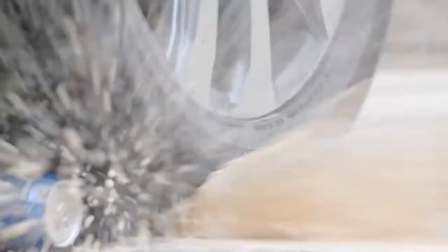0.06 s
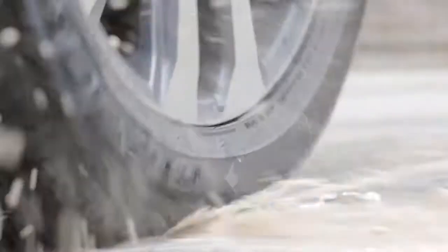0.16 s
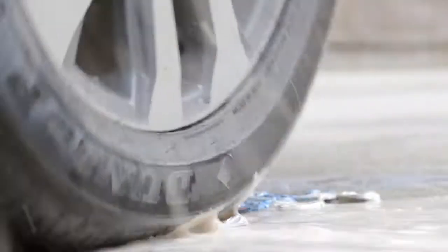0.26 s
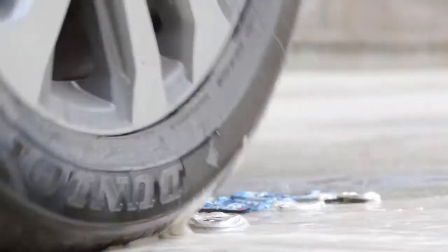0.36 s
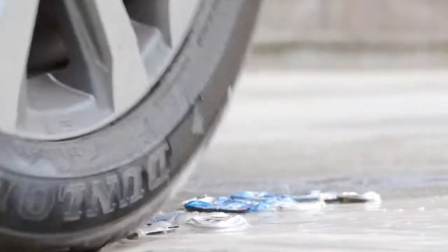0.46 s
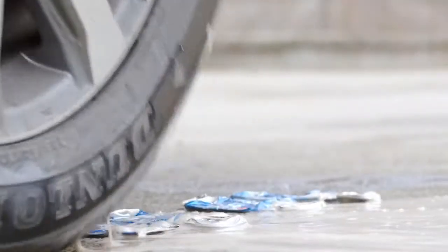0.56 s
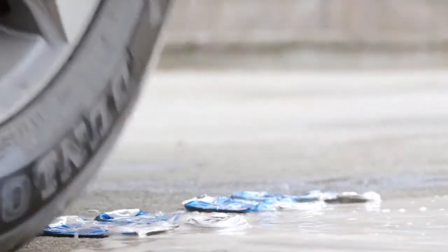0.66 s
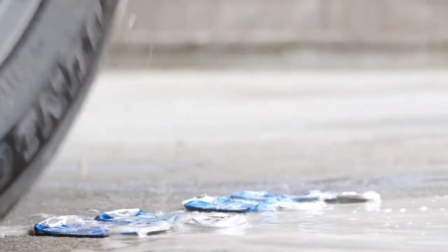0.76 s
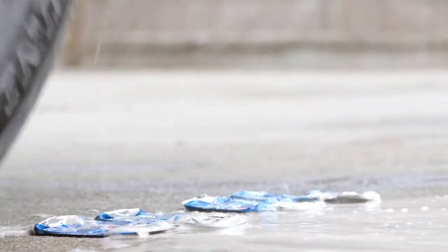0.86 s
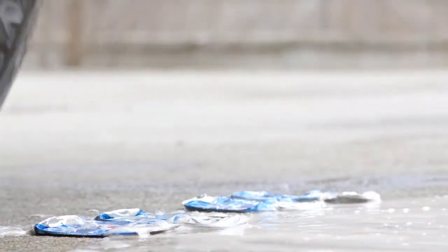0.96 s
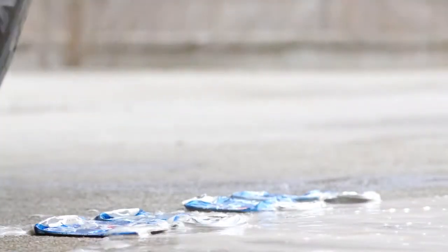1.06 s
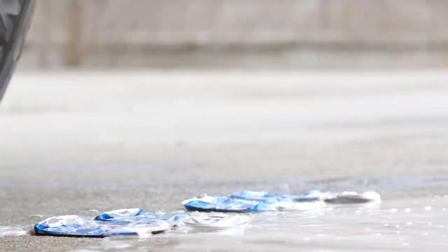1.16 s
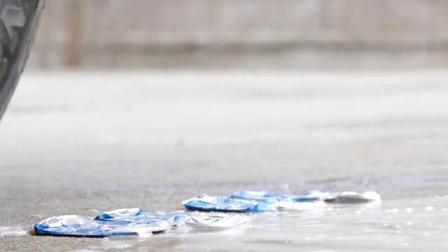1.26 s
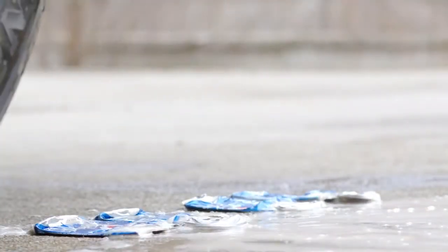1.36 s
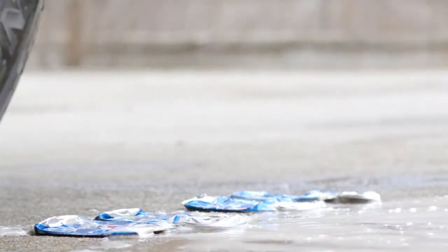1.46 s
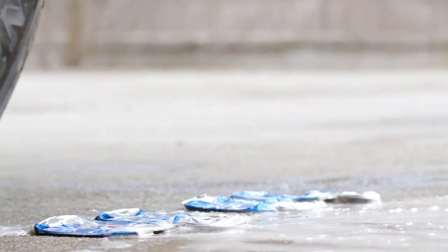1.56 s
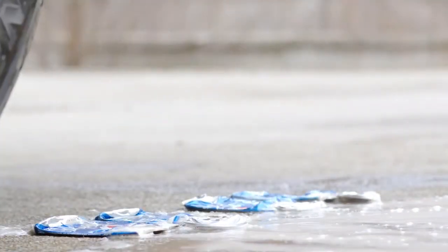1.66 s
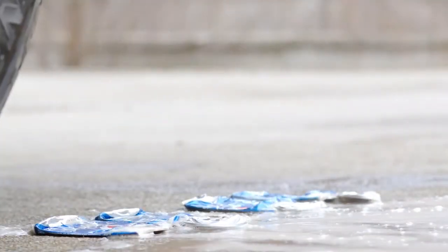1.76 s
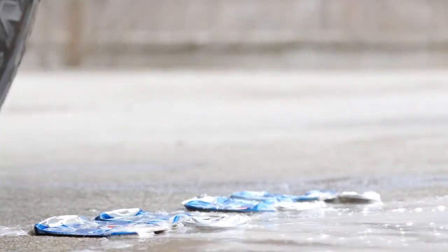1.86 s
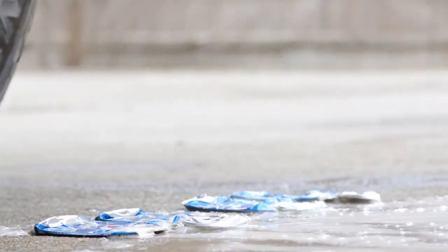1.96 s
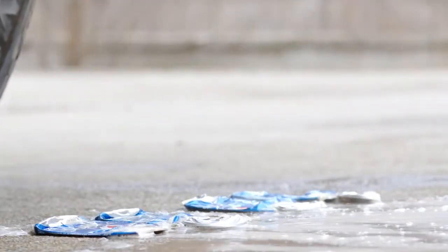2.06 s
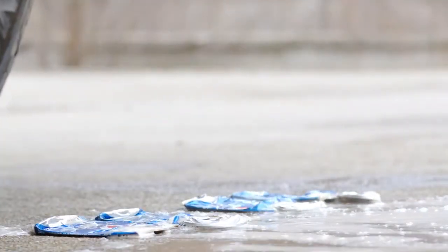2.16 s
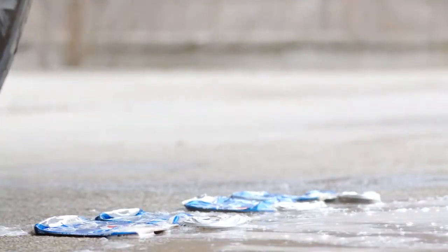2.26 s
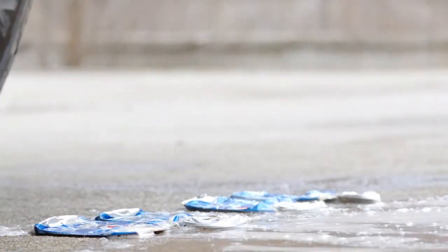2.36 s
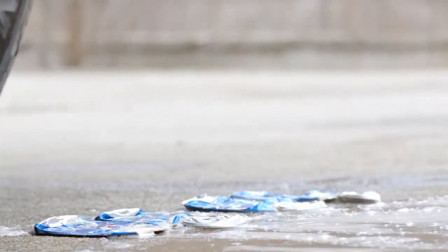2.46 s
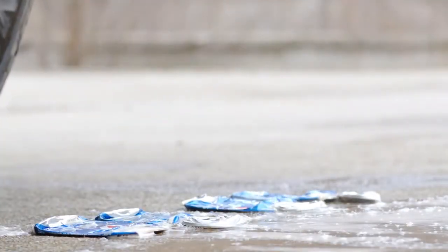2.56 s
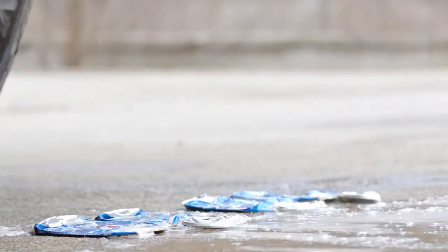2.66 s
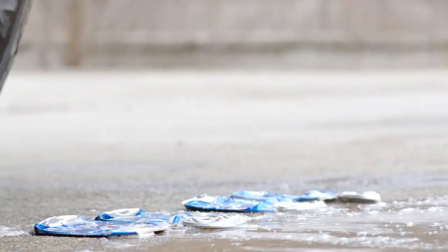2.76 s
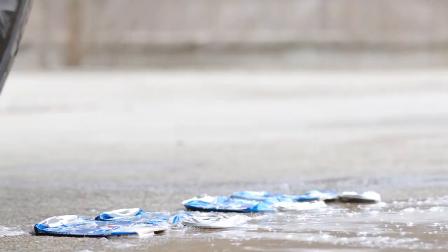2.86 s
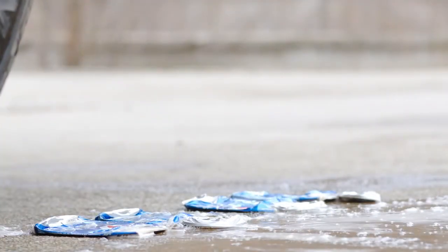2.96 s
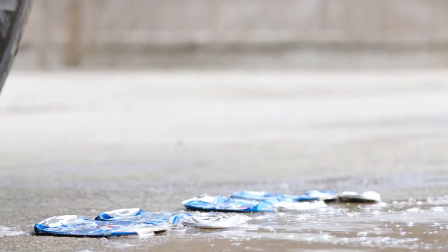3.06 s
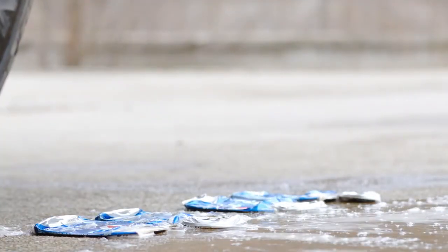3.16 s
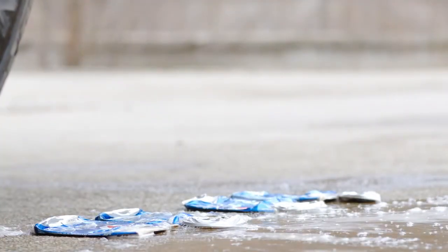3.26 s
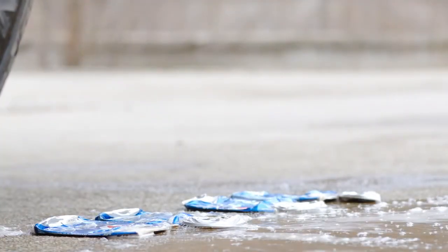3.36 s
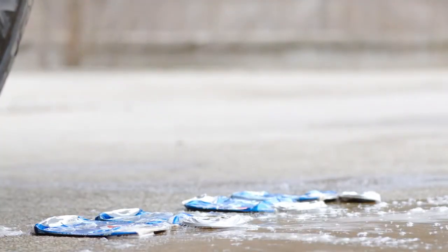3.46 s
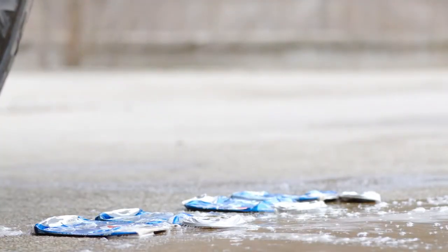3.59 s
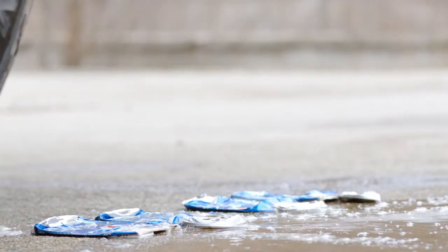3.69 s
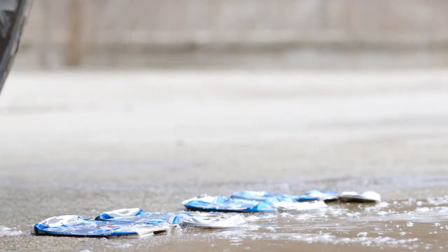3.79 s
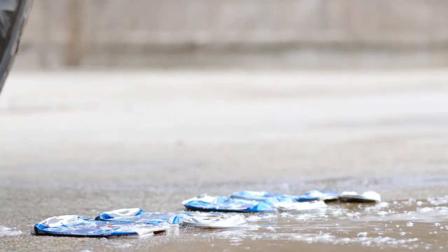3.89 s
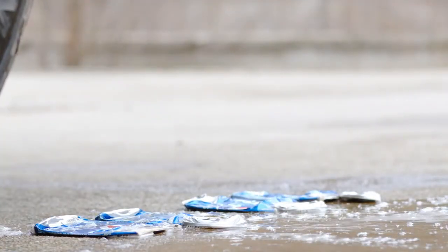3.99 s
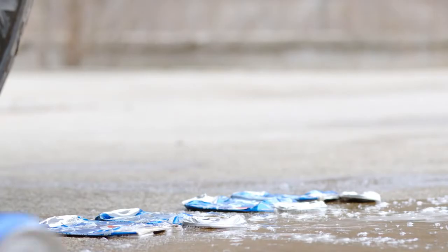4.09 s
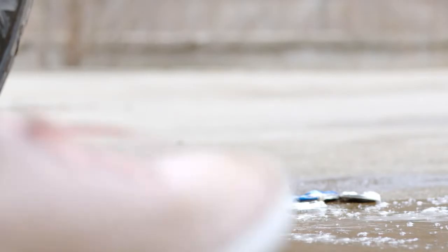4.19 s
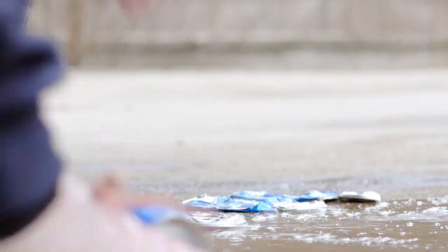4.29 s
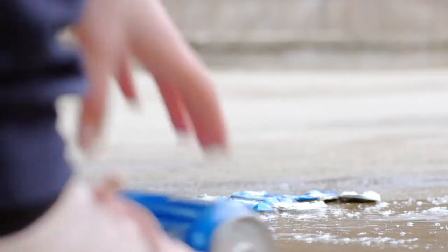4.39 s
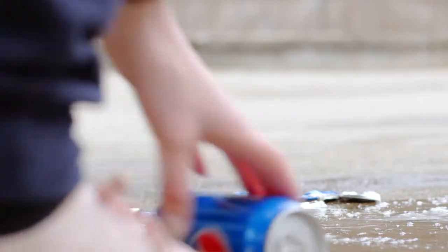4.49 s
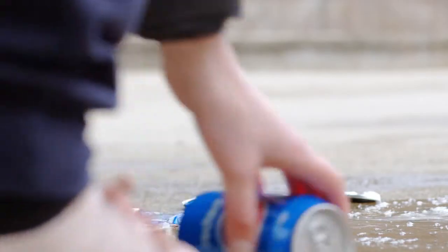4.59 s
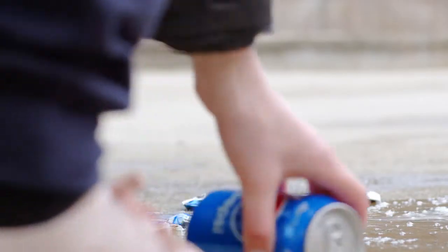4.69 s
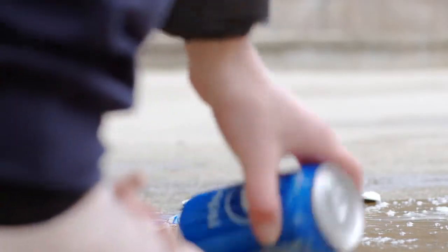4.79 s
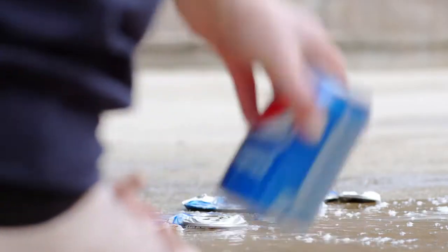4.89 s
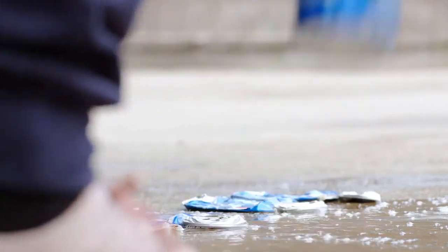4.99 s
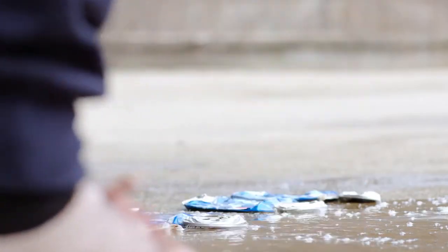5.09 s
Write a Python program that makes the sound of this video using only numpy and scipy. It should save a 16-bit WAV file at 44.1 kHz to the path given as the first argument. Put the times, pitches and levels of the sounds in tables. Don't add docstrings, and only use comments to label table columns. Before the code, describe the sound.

Outdoors on wet concrete, close to a camera microphone: right at the start a full can bursts under a rolling tyre with a hard pop, low thump, crackling metal and spattering jet. The burst is over within half a second. A much quieter engine idles steadily with low hum and clatter, foam fizzes faintly, wind rumbles on the microphone, and near the end the engine is switched off and runs down.

```python
import sys
import numpy as np
from scipy import signal
from scipy.fft import rfft, irfft
from scipy.io import wavfile
from scipy.ndimage import uniform_filter1d

SR = 44100
rng = np.random.default_rng(int(sys.argv[2]) if len(sys.argv) > 2 else 0)


def generate_wav(signal):
    frames = np.transpose(np.atleast_2d(signal))
    scaled = np.clip(frames, -1, 1) * 32767
    pcm = np.round(scaled).astype(np.int16)
    wavfile.write(sys.argv[1], SR, pcm)


def gain_from_decibels(decibels):
    exponent = np.asarray(decibels, float) / 20
    return 10 ** exponent


N = 226585
T = np.arange(N) / SR


def noise():
    return rng.standard_normal(N)


def unit(x):
    return x / np.sqrt(np.mean(x ** 2))


def peak_one(x):
    return x / np.max(np.abs(x))


def band(x, lo_hz, hi_hz, order=2):
    edges = [lo_hz, min(hi_hz, .45 * SR)]
    return signal.sosfilt(signal.butter(order, edges, "band", fs=SR, output="sos"), x)


def colour(x, points, rings=()):
    hz = np.maximum(np.arange(N // 2 + 1) * SR / N, 1)
    f, db = np.transpose(points)
    gain = gain_from_decibels(np.interp(np.log(hz), np.log(f), db, left=-80))
    for centre, width, _ in rings:
        gain = gain * (1 + 1 / (1 + (2 * (hz - centre) / width) ** 2))
    return unit(irfft(rfft(x) * gain, N))


def walk(rate):
    k = int(SR / rate)
    levels = np.repeat(rng.standard_normal(N // k + 1), k)
    return 0.3 * uniform_filter1d(uniform_filter1d(levels, k), k)[:N]


def grains(rate, spread_db):
    clicks = rng.random(N) < rate / SR
    return clicks * noise() * gain_from_decibels(spread_db * rng.exponential(size=N))


def ring(hz, t60, length):
    t = T[:int(SR * length)]
    return -np.sin(2 * np.pi * hz * t) * np.exp(-np.log(1000) * t / t60)


def swell(s, rise, fall):
    return np.exp(-np.maximum((s - T) / rise, (T - s) / fall))


def step(s, length):
    return np.clip((T - s) / length + .5, 0, 1)


def add(track, s, sound):
    i = int(s * SR)
    track[i:i + len(sound)] += sound[:N - i]


def blast():
    shock_s, shock_length_s = .0368, .0013
    shock = .29 * np.cos(np.pi / 2 * np.clip((T - shock_s) / shock_length_s, -1, 1)) ** 2

    slosh_s, slosh_hz, slows_s, dies_s = .044, 23, .12, .17
    after = T - slosh_s
    turns = slosh_hz * slows_s * (1 - np.exp(-after / slows_s))
    swing = -.19 * 1.2 * np.tanh(1.1 * np.cos(2 * np.pi * turns))
    slosh = swing * np.exp(-np.abs(after / dies_s) ** 3) * step(shock_s + .003, .006)

    thud = unit(band(noise(), 64, 116)) * gain_from_decibels(-27) * swell(slosh_s, 0.009, 0.044)
    buffet = unit(band(noise(), 138, 398)) * gain_from_decibels(-7.5 - 31.5) * np.exp(-(after / .12) ** 2)
    return shock + slosh + thud + buffet


# (time [s], peak level [dB], pitch [Hz], treble level over the crack [dB])
BUCKLES = [(.038, -27.5, 500, 7.5), (.04, -15.5, 710, 5), (0.0442, -14, 890, -17), (0.0614, -11, 880, -20),
           (.0647, -12.5, 800, -17), (0.0696, -16.5, 874, -0.5), (.091, -21.5, 1030, -13),
           (0.1223, -16, 1280, -28), (0.1332, -15, 1570, -13.5), (0.1355, -12.5, 1594, -43),
           (.1703, -23.5, 1370, -20), (0.2162, -25.5, 1550, 0.5), (0.225, -28, 1420, -14),
           (0.273, -29, 915, -26), (0.2801, -29, 725, -5.5), (0.2989, -31, 1700, -24),
           (0.3028, -30.5, 1830, -28), (.3393, -39.5, 960, 12.5), (0.3418, -26.5, 880, -26),
           (.439, -26, 1470, -14), (0.4582, -28.5, 780, -30), (.478, -28.5, 1470, -19),
           (0.4803, -33, 855, 0.5), (.483, -29.5, 1460, -20), (.5255, -37.5, 680, -7),
           (.6614, -36.5, 790, 0), (0.8084, -28, 930, -18), (0.8243, -43, 690, -17),
           (0.8344, -38, 800, -15), (1.2074, -37, 640, -16)]


def crumple():
    out = np.zeros(N)
    t = T[:500]
    t60 = 0.017
    for s, db, hz, treble_db in BUCKLES:
        lower_hz = hz * (0.67 + 0.021 * rng.standard_normal())
        upper_hz = hz * (1.42 + 0.32 * rng.standard_normal())
        body = ring(hz, t60, t60) + 0.1 * ring(lower_hz, t60, t60)
        body += 0.55 * ring(upper_hz, t60 / 2, t60)
        tear = rng.standard_normal(500) * np.exp(-t / .0013) - 8 * (t == 0)
        crack = peak_one(band(tear, 0.62 * hz, 1.56 * hz))
        snap = peak_one(band(tear, 1900, 4600, order=3) + .17 * band(tear, 4600, 11000))
        add(out, s, gain_from_decibels(db - 7) * body)
        add(out, s, gain_from_decibels(db - 3) * crack + gain_from_decibels(db + treble_db - 1) * snap)
    return out


# (time [s], peak level [dB], frequency [Hz], decay time T60 [s], rise time [s])
LONE_MODES = [
    (.05, -36.5, 179, 1.1, .02),
    (.134, -21, 580, .04, .002),
    (3.855, -52, 1080, .35, .03),
]


def lone_rings():
    out = np.zeros(N)
    for s, db, hz, t60, rise in LONE_MODES:
        build_up = np.minimum(T[:int(SR * t60)] / rise, 1)
        add(out, s, gain_from_decibels(db) * ring(hz, t60, t60) * build_up)
    return out


def yard_echo(can):
    t60 = 0.2
    tail = band(rng.standard_normal(SR // 3), 140, 7400, order=1)
    tail = tail * np.exp(-np.log(1000) * T[:SR // 3] / t60)
    return gain_from_decibels(-15) * signal.fftconvolve(can, tail / np.sqrt(np.sum(tail ** 2)))[:N]


# (frequency [Hz], spectral level [dB per Hz])
JET_SPECTRUM = [(100, -26), (280, -8), (450, 1.5), (800, -0.5), (1400, -7), (2000, -5), (3000, -10),
                (4200, -20.5), (15500, -38)]
# (frequency [Hz], spectral level [dB per Hz])
FIZZ_SPECTRUM = [(2060, 0.5), (3500, 1.5), (3850, -1), (4470, 1), (7620, -4), (13300, -9.5), (15100, -8),
                 (15700, -14)]
# (time [s], peak level [dB])
JET_SPURTS = [
    (.002, -30),
    (0.04, -14.5),
    (0.068, -28.5),
    (0.094, -29),
    (0.131, -29),
    (0.169, -35.5),
]
# (time [s], level over the steady mist [dB])
MIST_SURGES = [
    (.042, -1),
    (.072, -3),
    (.095, -2),
    (.172, 3),
]


def spray():
    jet_from_s, empty_s = .038, .222
    flowing = step(jet_from_s, 0.0037) * (1 - step(empty_s, .04))

    spatter = noise() * gain_from_decibels(5.0 * walk(97)) + 1.1 * unit(grains(1500, 1.5))
    spurts = sum(gain_from_decibels(db) * swell(s, 0.0019, 0.0077) for s, db in JET_SPURTS)
    dribble = gain_from_decibels(-53.5) * (1 - step(0.49, 0.15))
    jet = colour(spatter, JET_SPECTRUM) * (spurts + gain_from_decibels(-46.5) * flowing + dribble)

    foam = noise() * gain_from_decibels(0.82 * walk(24.25)) + 0.45 * unit(grains(2500, 1.7))
    surges = 1 + sum(gain_from_decibels(db) * swell(s, .006, 0.023) for s, db in MIST_SURGES)
    mist_db = -59.5 + 3 * (T - jet_from_s) + 3.1 * walk(52)
    mist = gain_from_decibels(mist_db) * flowing * surges
    mist += gain_from_decibels(-46) * np.exp(-T / 0.022)
    bed = gain_from_decibels(-69.5 - 5.5 * np.maximum(T - 1.76, 0))
    return jet + colour(foam, FIZZ_SPECTRUM) * gain_from_decibels(4) * np.hypot(mist, bed)


# (time [s], level of the noise before its band is cut out [dB], low
# edge [Hz], high edge [Hz], decay time [s])
IMPACTS = [(.144, -14.5, 1280, 1750, 0.012), (.601, -27.5, 1690, 2030, 0.011),
           (.811, -31, 800, 1630, 0.019), (1.209, -44.5, 700, 2500, 0.026), (2.81, -59, 7000, 10000, .005),
           (2.1, -65, 3000, 15000, .011), (3.347, -71, 5000, 12000, .005), (3.488, -68, 7000, 15900, .0075),
           (3.935, -53, 5150, 5560, .019), (3.989, -62, 12400, 15500, 0.0065),
           (3.99, -63, 1852, 8241, 0.0087), (4.033, -77, 9000, 15000, .006),
           (4.454, -63, 3600, 15500, 0.01), (4.457, -49, 2400, 3530, 0.041), (2.8, -61, 1210, 4000, .012),
           (4.619, -68, 8640, 15000, .007)]


def ticks():
    out = np.zeros(N)
    for s, db, lo_hz, hi_hz, decay in IMPACTS:
        burst = rng.standard_normal(2000) * np.exp(-T[:2000] / decay)
        add(out, s, gain_from_decibels(db) * band(burst, lo_hz, hi_hz))
    return out


# (time [s], firing rate [Hz])
FIRING_RATE = [
    (0, 46.63),
    (4.2, 46.63),
    (4.41, 44.2),
    (4.61, 40.2),
    (4.85, 35.5),
    (5.14, 31.5),
]


def exhaust_lines(cycle, coast):
    out = np.zeros(N)
    for k, db in zip(LINE_ORDERS, LINE_LEVELS):
        lag = .8 + 2.1 * (2 < k < 16 and k != 8)
        coast_db = 12 if k == 8 else -14 if k < 8 else -12
        level = np.sqrt(2) * gain_from_decibels(db + coast * coast_db + 3.7 * walk(6.57))
        out += level * np.cos(2 * np.pi * k * cycle - lag + 0.14 * walk(1.6))
    return out


LINE_ORDERS = [2, 3, 4, 5, 6, 8, 13, 14, 16, 21, 23, 24, 46]
LINE_LEVELS = [-55, -71, -73, -73, -58, -56, -67, -68, -59, -72, -70, -65, -77]
# (frequency [Hz], spectral level [dB per Hz])
BAY_SPECTRUM = [(88, -24), (150, -2.5), (220, -15), (300, -3), (400, -4), (540, -9), (680, -8), (850, -6.5),
                (950, -12.5), (1900, -13.5), (2100, -22.5), (3200, -22), (3800, -27), (15000, -53.5)]
# (frequency [Hz], width [Hz], level [dB], not used)
BAY_MODES = [(458, 49, -1), (625, 88, 0), (1060, 23, -7), (1884, 20, -7), (2400, 146, -14),
             (2925, 130, -12), (5070, 60, -19)]
# (centre [Hz], width [Hz], level [dB], share of the loose tappet [1])
VALVE_NOISE = [(680, 163, 4, 0.21), (1716, 290, -5.5, 0.59), (3000, 480, -9.5, 0.84),
               (4930, 580, -16.5, 0.88), (6530, 1100, -21.5, 0.55)]


def engine():
    firing_hz = np.interp(T, *np.transpose(FIRING_RATE))
    cycle = .22 + np.cumsum(firing_hz) / (8 * SR)
    firing = 8 * cycle
    coast = 1 - firing_hz / firing_hz[0]
    off = step(4.58, 0.27)
    chance = rng.standard_normal((N // 500, 3))

    since = firing % 1
    strength = gain_from_decibels(2.2 * chance[firing.astype(int), 0])
    puff = .7 + .5 * strength * since / .25 * np.exp(1 - since / .25)
    clatter = colour(puff * noise(), BAY_SPECTRUM, BAY_MODES)
    low = band(clatter, 130, 1190)
    knock = 1 + .3 * np.cos(2 * np.pi * (cycle - .33))
    bright_db = 2 - 20 * (1 - step(0.51, 0.071))
    treble = (clatter - low) * gain_from_decibels(bright_db + .5 * walk(22.0))
    clatter = low * knock * gain_from_decibels(0.2 * walk(31)) + treble

    valves = .5 + .45 * gain_from_decibels(2.5 * chance[firing.astype(int), 1]) * np.exp(-((firing - .25) % 1) / .3)
    turn = cycle - .40
    tappet = np.exp(-(turn % 1) / .15) * gain_from_decibels(1.5 * chance[(turn + 1).astype(int), 2])
    train = np.zeros(N)
    for hz, width, db, share in VALVE_NOISE:
        hiss = unit(band(noise(), hz - width / 2, hz + width / 2, order=3))
        train += gain_from_decibels(db) * hiss * (valves + 2.8 * share * tappet)

    bay = 1.046 * clatter + gain_from_decibels(-1 + 1.5 * off - 6) * train
    return exhaust_lines(cycle, coast) + gain_from_decibels(-58.5 - 5 * off) * bay


# (time [s], wind level [dB], buffeting level [dB])
WIND_GUSTS = [
    (.3, -41.5, -66),
    (.47, -42.5, -58),
    (0.589, -42, -59),
    (0.769, -47, -65),
    (.92, -44, -67),
    (1.152, -41.5, -49.5),
    (1.42, -42.5, -58),
    (1.68, -53.5, -49),
    (4.26, -52.5, -86),
    (4.92, -54, -69),
]


def wind():
    gust_s = 0.08
    speed, shake = gain_from_decibels(-64), gain_from_decibels(-62)
    for s, wind_db, buffet_db in WIND_GUSTS:
        gust = np.exp(-((T - s) / gust_s) ** 2)
        speed = speed + gain_from_decibels(wind_db) * gust
        shake = shake + gain_from_decibels(buffet_db) * gust
    eddies = unit(band(noise(), 13.9, 25.1, order=3)) * speed
    rumble = unit(band(noise(), 32, 101)) * 0.33 * speed
    buffet = unit(band(noise(), 138, 398)) * gain_from_decibels(-7.5) * shake
    return eddies + rumble + buffet


def camera_hiss():
    return gain_from_decibels(-89) * unit(band(noise(), 11500, 15000))


def scene():
    can = crumple() + lone_rings()
    burst = blast() + can + yard_echo(can) + spray() + ticks()
    return (burst + engine() + wind() + camera_hiss())[None]


def roll_off(x):
    return signal.sosfilt(signal.butter(12, 15820, fs=SR, output="sos"), x)


def record(dry):
    mix = np.tanh(1.204 * dry) / 1.134
    return roll_off(mix)


dry = scene()
out = record(dry)
generate_wav(out)
```